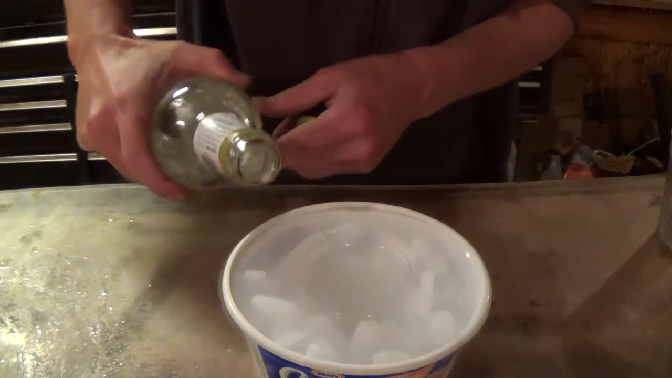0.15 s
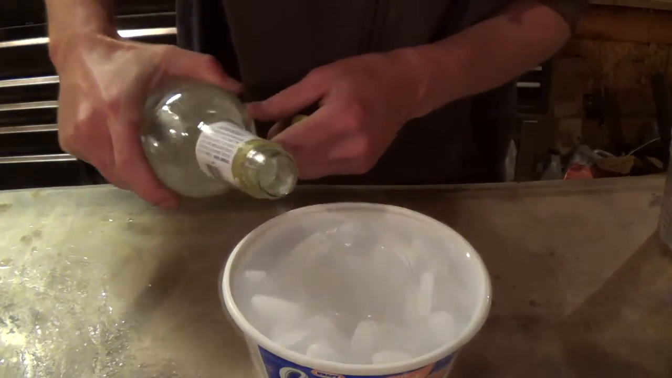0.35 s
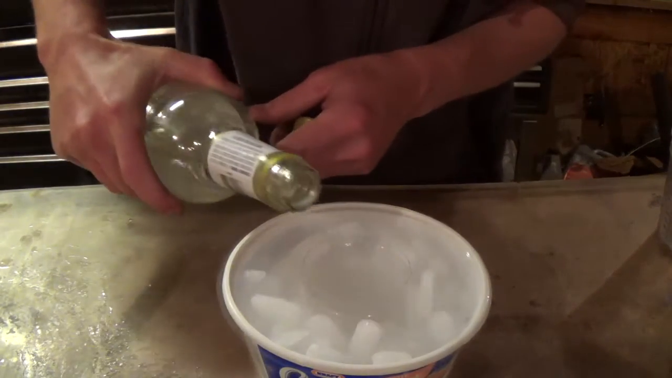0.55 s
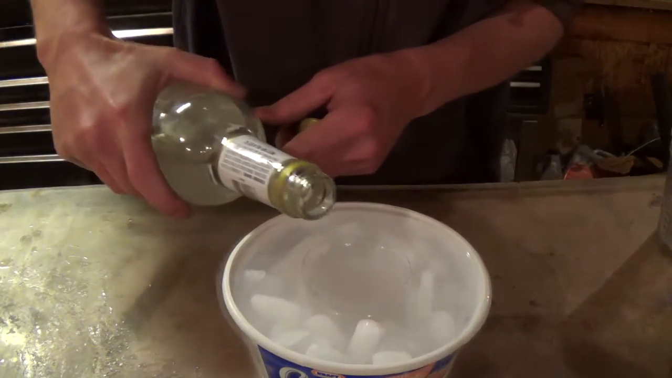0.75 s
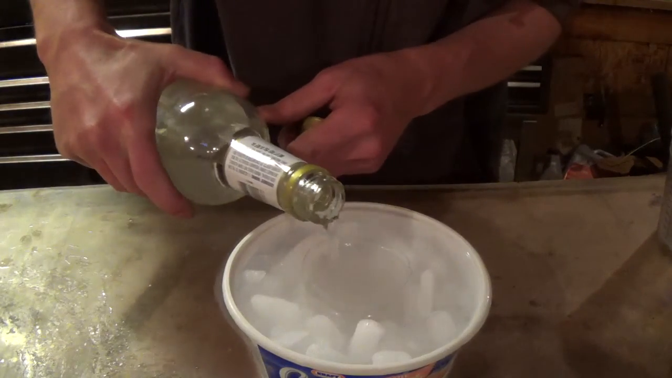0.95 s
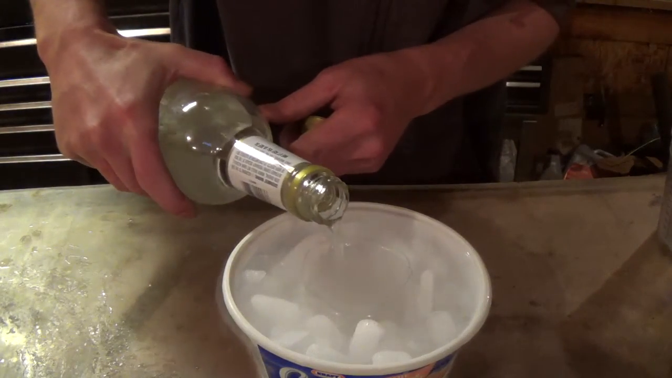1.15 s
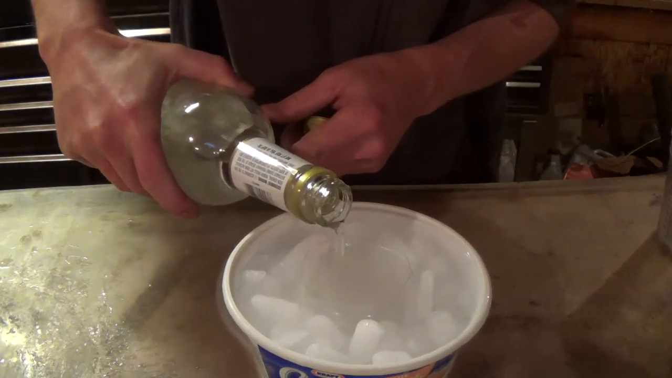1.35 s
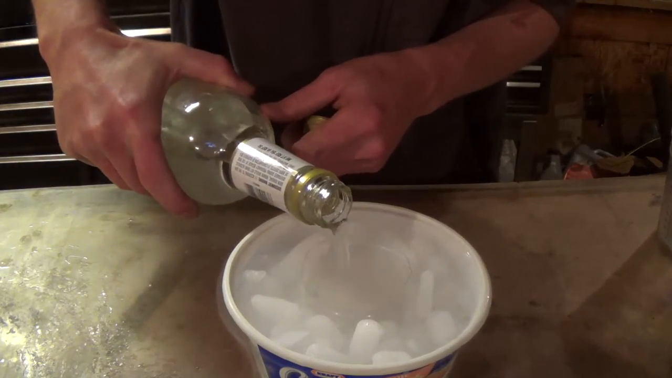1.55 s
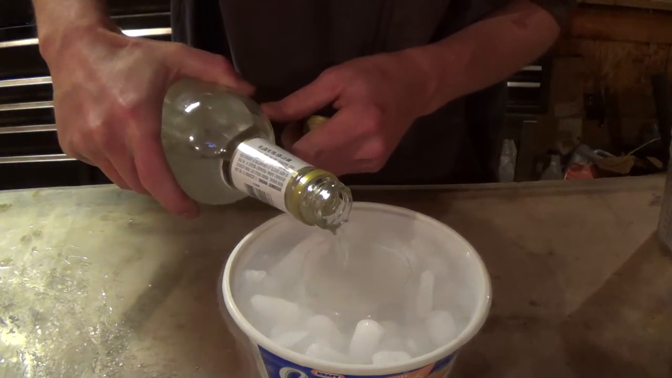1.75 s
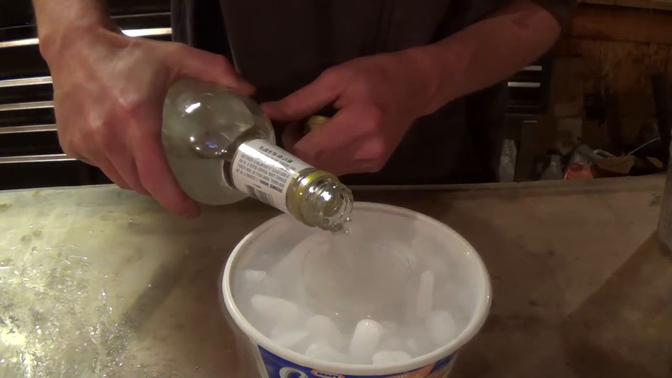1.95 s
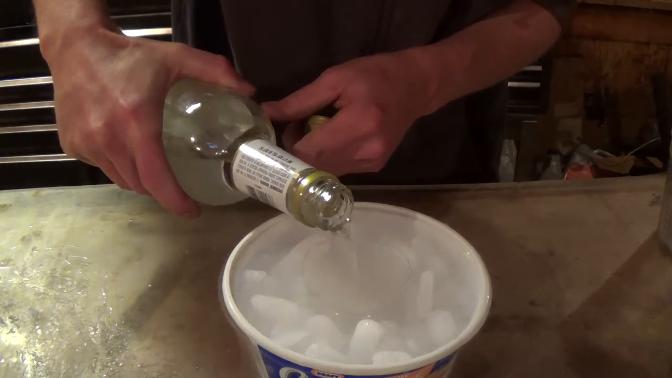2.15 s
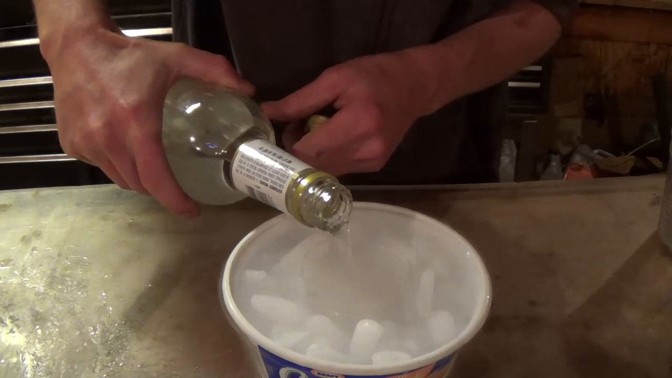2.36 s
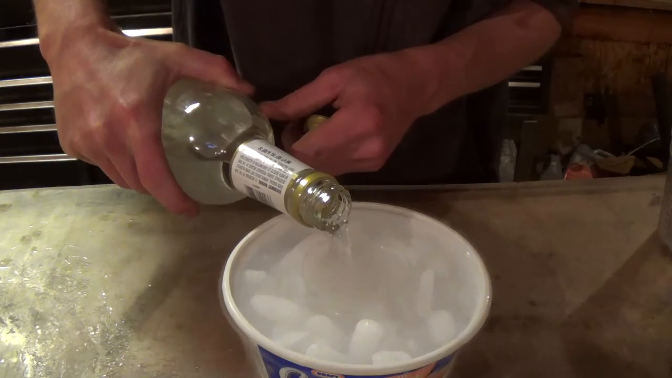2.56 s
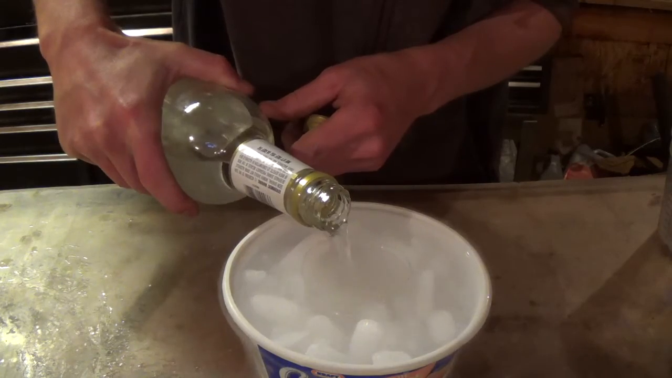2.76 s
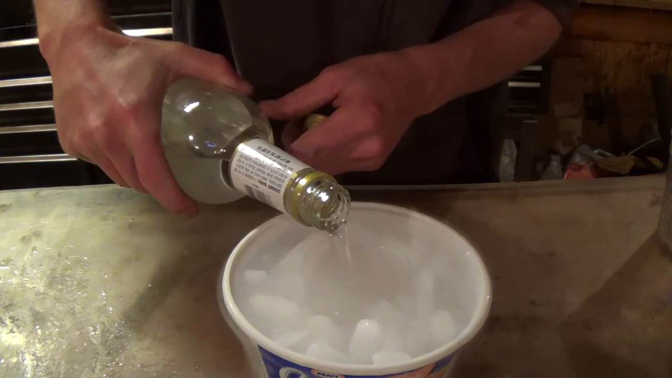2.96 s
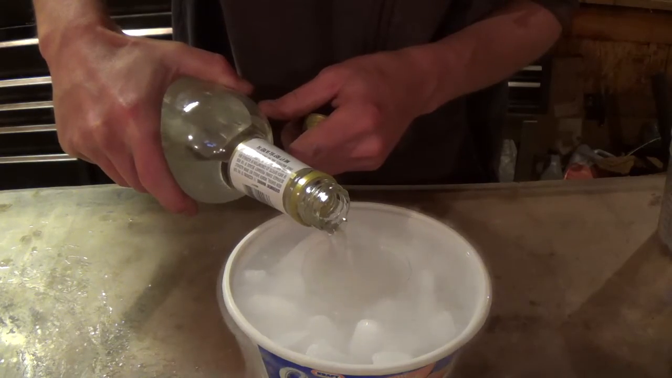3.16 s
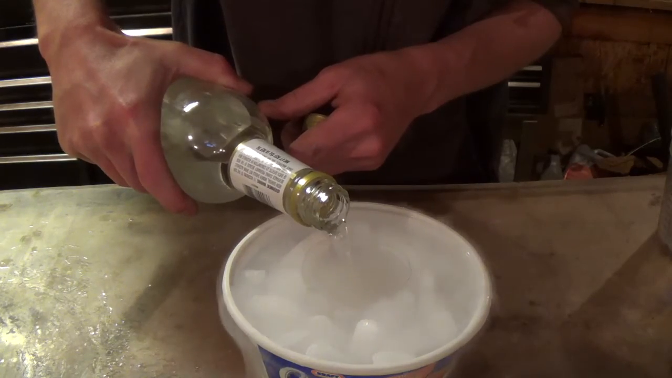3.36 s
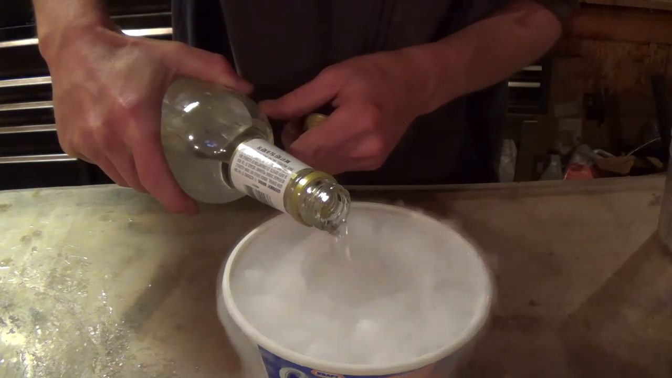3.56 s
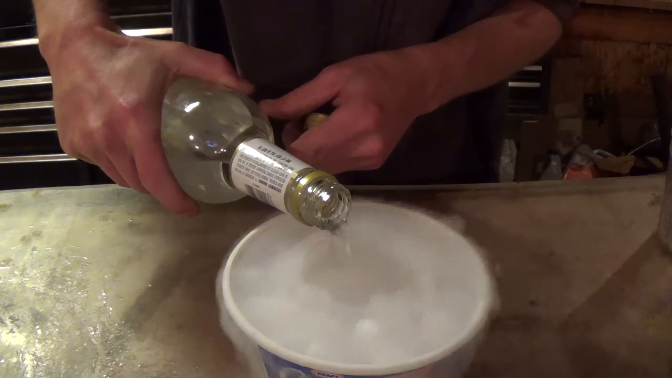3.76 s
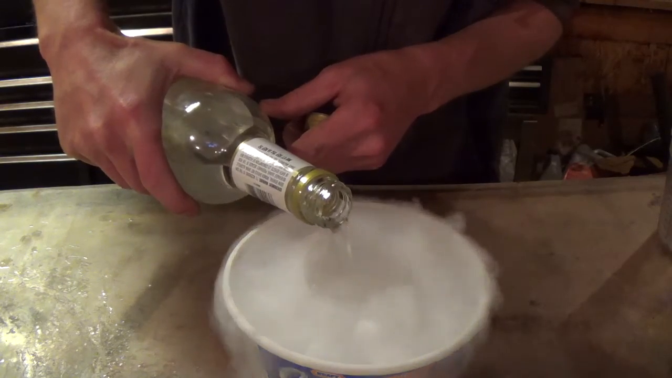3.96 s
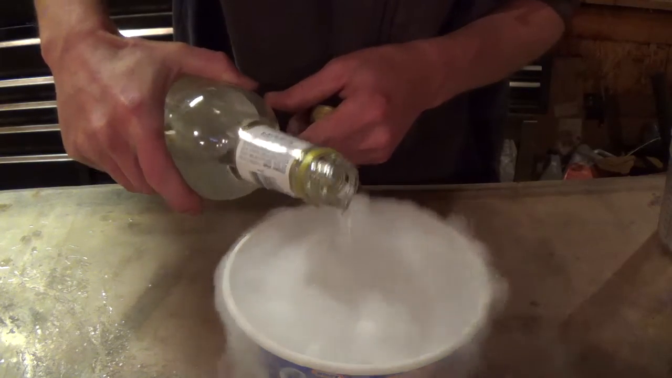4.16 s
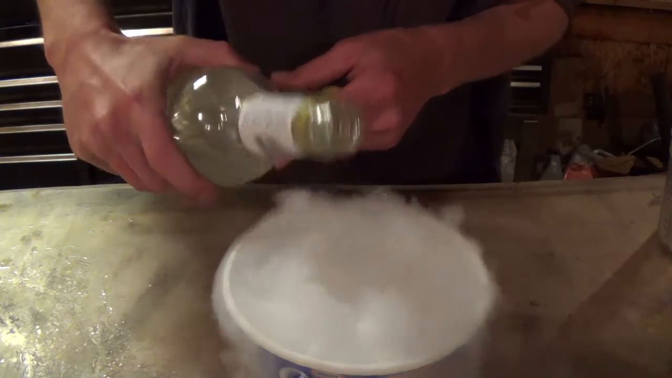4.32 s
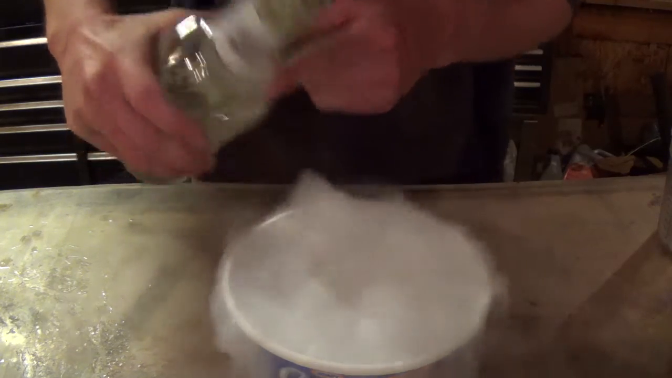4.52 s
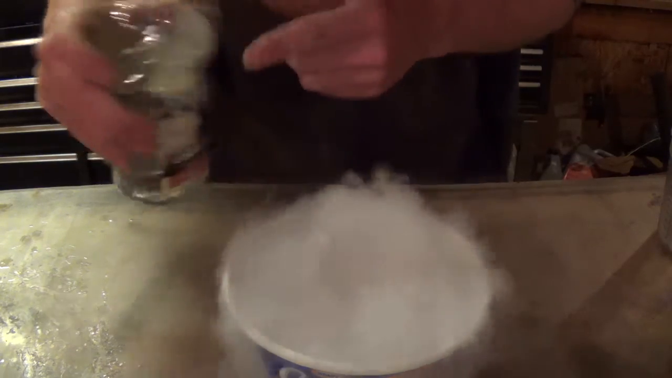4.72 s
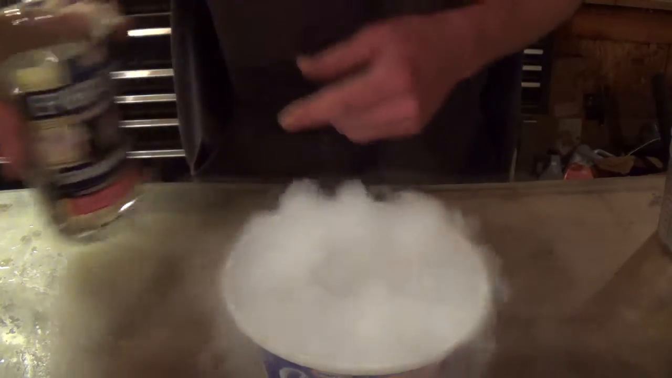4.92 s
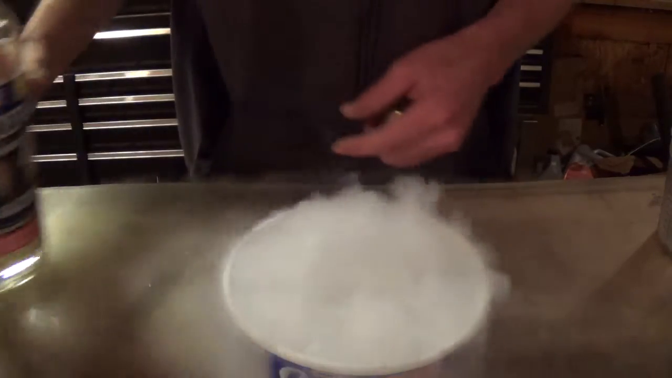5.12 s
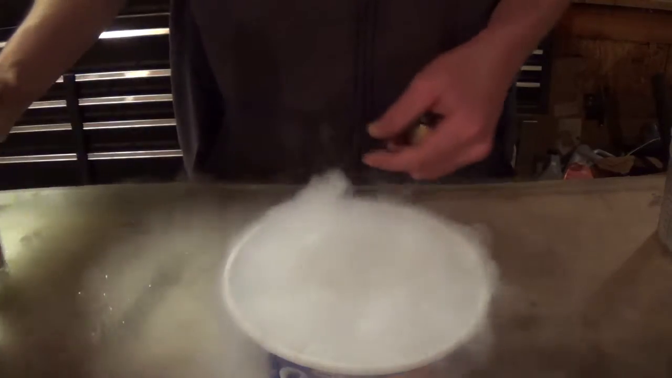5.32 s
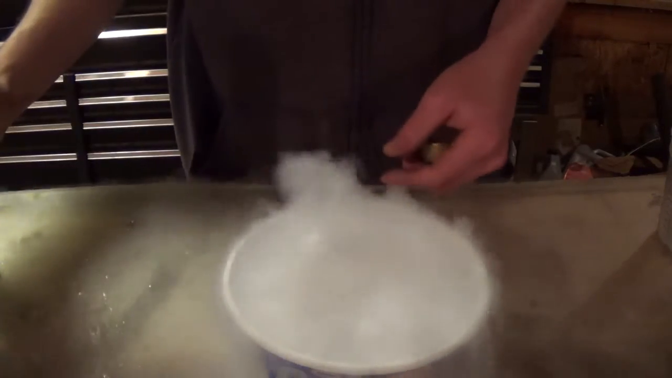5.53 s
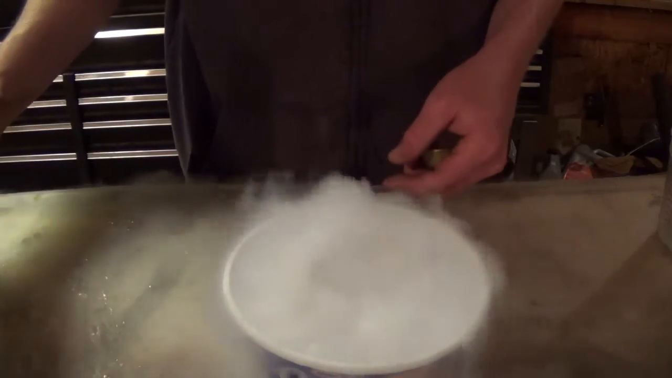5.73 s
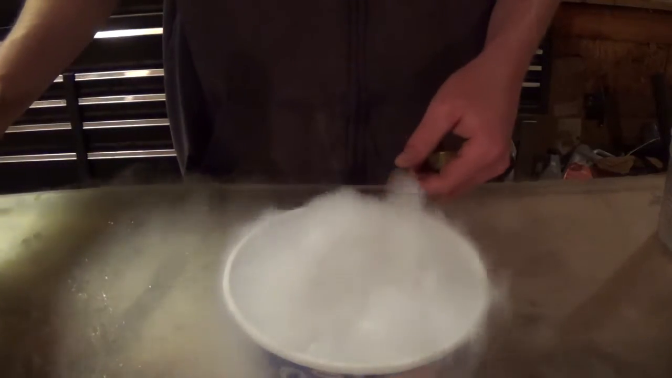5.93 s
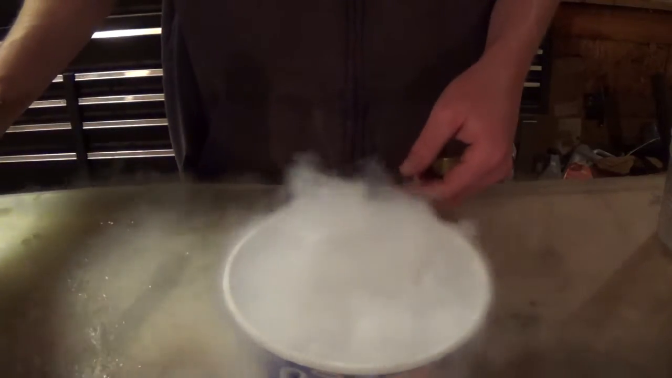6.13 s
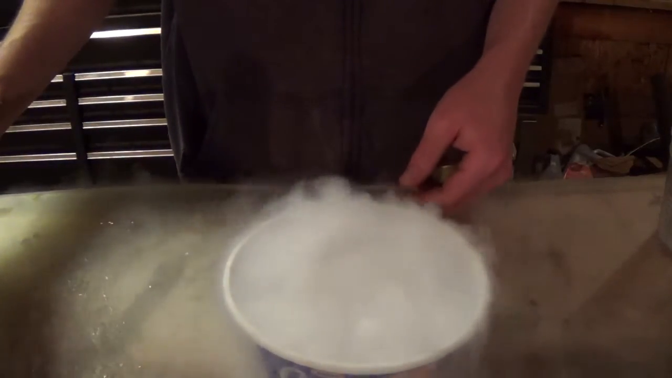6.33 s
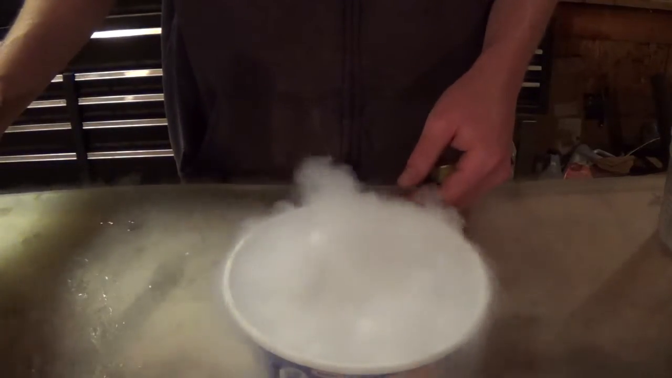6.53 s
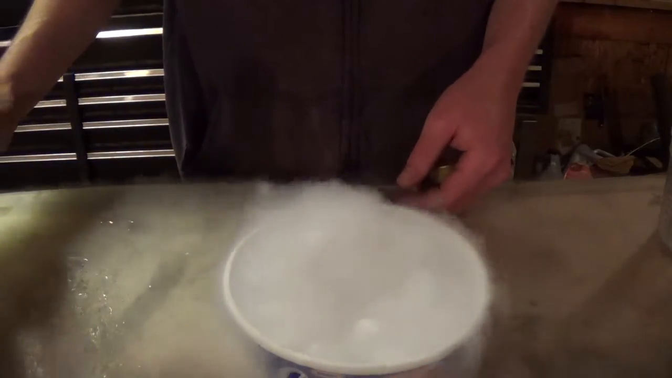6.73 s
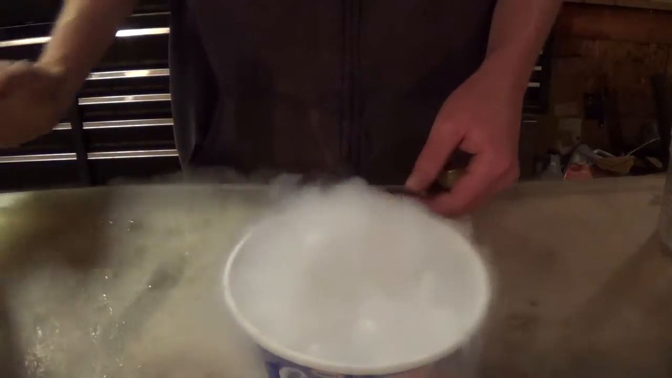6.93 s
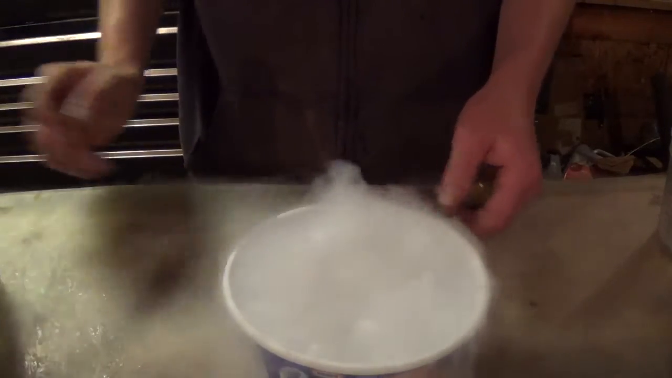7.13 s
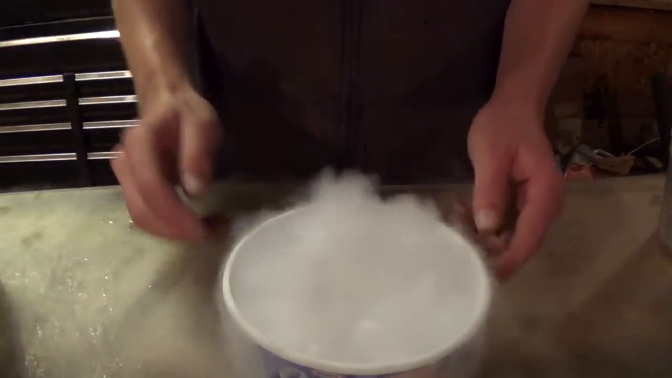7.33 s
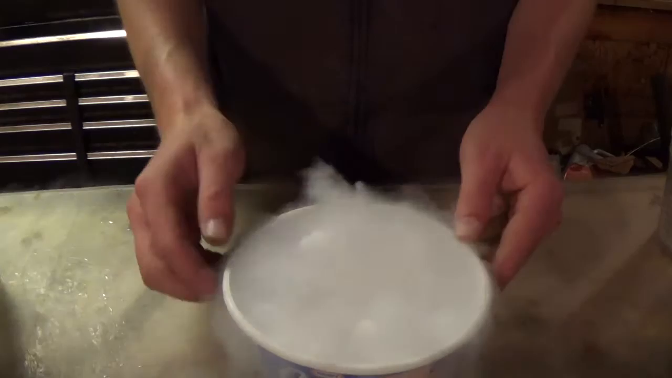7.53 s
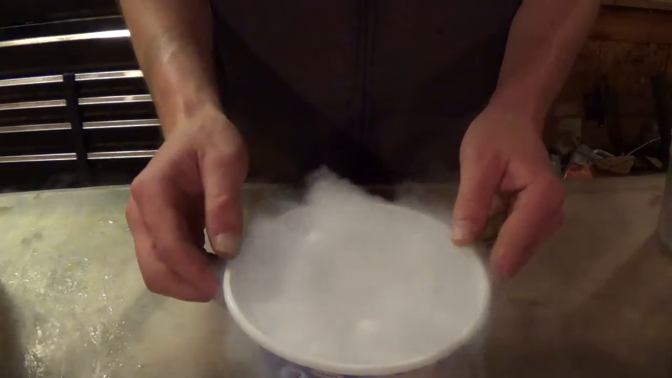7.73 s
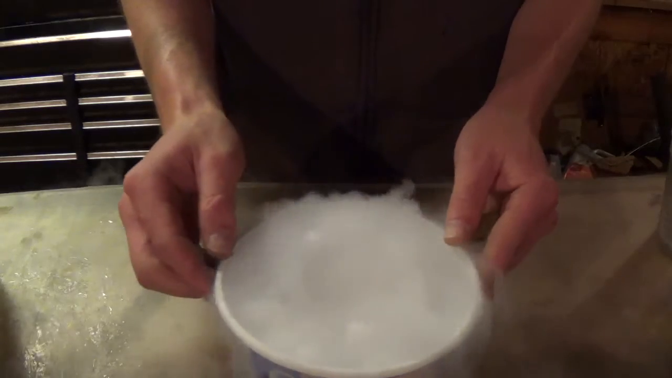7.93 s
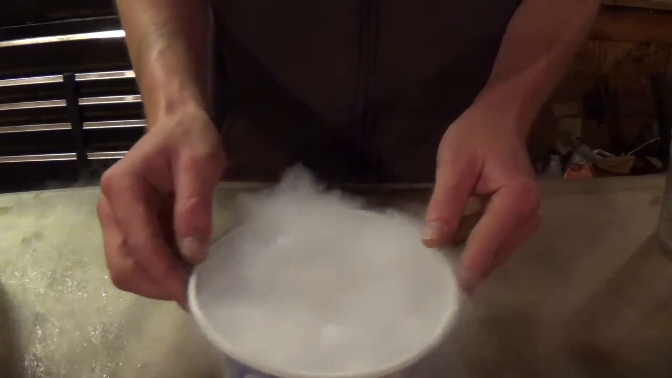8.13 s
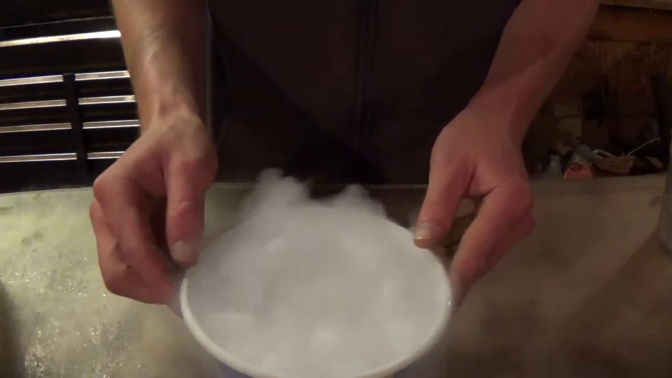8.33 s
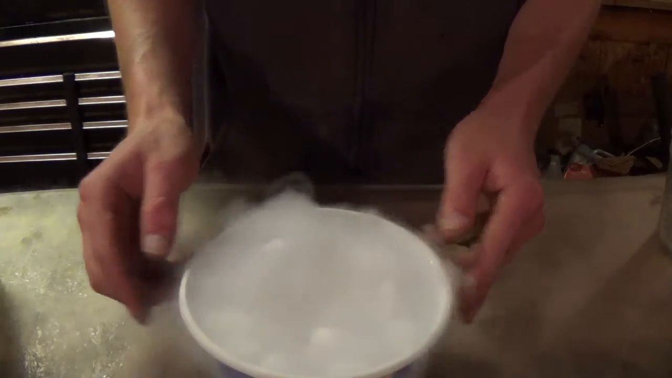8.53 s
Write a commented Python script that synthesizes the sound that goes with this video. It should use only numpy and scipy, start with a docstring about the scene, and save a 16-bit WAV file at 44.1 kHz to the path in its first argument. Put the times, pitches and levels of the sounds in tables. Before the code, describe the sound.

Liquid dribbles onto dry ice with sharp crackling pops, then a fizzing boil swells to a steady dense hiss, with a few bench knocks and scrapes.

```python
"""A workshop bench in a small room, close to a camera: liquid is poured from a bottle over dry ice in a plastic tub.
Drops crack and pop on the cold lumps as pairs of damped tones with noise bursts; then the bath boils up into
a dense fizz of tiny rising tones over blurred noise. The bottle is set down and hands nudge the tub: knocks
ring damped bench modes, and short scrapes are bands of noise. Still air lies under it, and the room answers."""
import sys
import numpy as np
from scipy import signal
from scipy.fft import rfft, irfft, next_fast_len
from scipy.io import wavfile
from scipy.ndimage import map_coordinates

SR = 44100
rng = np.random.default_rng(int(sys.argv[2]) if len(sys.argv) > 2 else 0)


def persist_wave(psi):
    """Save psi, clipped to +-1, as 16-bit WAV."""
    counts = np.round(np.clip(psi, -1, 1) * 32767).astype(np.int16)
    wavfile.write(sys.argv[1], SR, np.atleast_2d(counts).T)


def boost_factor(decibels):
    """Convert a level in decibels to a linear amplitude factor."""
    exponent = np.asarray(decibels, float) / 20
    return 10 ** exponent


N = 382788

# colour of the fine spray, from the bath and from single pops: f/Hz, level/dB per Hz
SPRAY_COLOUR = [(3820, -10), (6500, -17), (7380, -9), (10200, -2), (10800, -2.5), (11300, -23.5),
                (14700, -47), (22000, -120)]


def unit(x):
    """Scale to rms 1."""
    return x / np.sqrt(np.mean(x ** 2) + 1e-20)


def along(points, hz):
    """Interpolate (Hz, value) points on a log frequency axis."""
    f, v = np.transpose(points)
    return np.interp(np.log(hz + 1), np.log(f + 1), v)


def over_time(rows):
    """Interpolate (s, value) rows to one value per sample."""
    s, value = np.transpose(rows)
    return np.interp(np.arange(N) / SR, s, value)


def wobble(rate):
    """A smooth random curve, rate knots a second."""
    knots = rng.standard_normal(int(N * rate / SR) + 4)
    return map_coordinates(knots, [np.arange(N) * rate / SR])


def filtered(x, response):
    """x times a response of frequency."""
    m = next_fast_len(N + 8192)
    return irfft(rfft(x, m) * response(np.fft.rfftfreq(m, 1 / SR)), m)[..., :N]


def stereo(pair, spectrum, alike):
    """Turn two unrelated white signals into a coloured left-right pair of rms 1 with a set likeness."""
    def mid_side(hz):
        turn = np.arccos(np.clip(along(alike, hz), -1, 1)) / 2
        return boost_factor(along(spectrum, hz)) * [np.cos(turn), np.sin(turn)]

    mid, side = filtered(pair, mid_side)
    return unit(np.array([mid + side, mid - side]))


def still_air():
    """The still air of the shop: wide noise, heaviest in the bass; its level wavers several times a second."""
    # colour of the air: f/Hz, level/dB per Hz
    air_colour = [(15, 19.5), (30, 15), (55, 5.5), (80, -10), (213, -5), (450, -13), (970, 2), (1100, -6),
                  (1700, -9.5), (2600, -7.5), (7000, -10.5), (10500, -16.5)]
    # how alike the air is left and right: f/Hz, likeness (0-1)
    air_alike = [(60, 1), (270, 0.27), (1200, 0.21), (10000, 0.29)]
    level_db = -51.5 + 3.3 * wobble(5.8)
    return boost_factor(level_db) * stereo(rng.standard_normal((2, N)), air_colour, air_alike)


def room(x):
    """Each frequency of the room's answer dies at its own speed; the tail differs from moment to moment."""
    # how long the room rings: f/Hz, t60/s
    ring_times = [(100, 0.21), (220, 0.52), (650, 0.35), (2000, 0.4), (10000, 0.12)]
    # how alike the answer is left and right: f/Hz, likeness (0-1)
    answer_alike = [(100, 1), (500, 0.73), (3000, 0.29)]
    out, step = np.zeros((2, N + 2 * SR)), SR // 3
    for start in range(0, N, step):
        hz, t, z = signal.stft(rng.standard_normal((2, SR // 2)), SR, nperseg=256)
        turn = np.arccos(np.clip(along(answer_alike, hz), -1, 1))[:, None] / 2
        z = np.cos(turn) * z[0] + np.sin(turn) * z[1] * [[[1]], [[-1]]]
        decay = boost_factor(-60 * t / along(ring_times, hz)[:, None])
        tail = signal.istft(z * decay, SR, nperseg=256)[1]
        tail = tail / np.linalg.norm(tail[0])
        wet = signal.fftconvolve(x[None, start:start + step], tail, axes=1)
        out[:, start + 200:][:, :wet.shape[1]] += wet  # 200 samples behind the direct sound
    return out[:, :N]


def drags():
    """Lumps and bases scrape: each stroke is one band of friction noise, with gritty scratches on top."""
    # strokes: start t/s, length/s, level/dB when pressed hardest, band f/Hz,
    # share of the length at which it presses hardest
    strokes = [(3.4, 0.12, -42, 640, 0.21), (3.391, 0.048, -38, 1130, 0.079), (5.2, 0.048, -44, 1160, .3),
               (5.7142, 0.0086, -24.5, 1860, 0.073), (5.712, 0.039, -34, 1560, .45),
               (5.726, .046, -29, 663, 0.46), (5.735, 0.023, -34.5, 1000, 0.44),
               (7.96, 0.41, -54.5, 240, 0.6), (8.059, .013, -33, 3900, .2),
               (8.06, 0.0079, -27.5, 5900, .15)]
    # grit catching under a base: t/s, peak level/dB, build-up/s and die-away/s (times for 20 dB)
    scratches = [(5.7146, -18.5, .0005, 0.0083), (5.744, -31, 0.03, 0.024), (7.97, -38, .004, 0.0071),
                 (7.972, -38.5, .042, 0.055), (7.979, -25.5, 0.0013, 0.0035), (8.061, -28, .002, 0.0044),
                 (8.062, -36, 0.024, 0.024), (8.067, -40, 0.00088, 0.0049), (8.081, -36, .002, .007),
                 (8.14, -37, 0.049, 0.077), (8.172, -30.5, .0015, 0.005)]
    # colour of the grit: f/Hz, level/dB per Hz
    grit_colour = [(1000, -22), (2800, -18), (3700, -1), (5500, -5), (7500, -2.5), (10000, -0.5),
                   (11300, -3)]
    start_db, end_db, width_octaves = -13, -20.5, 0.39  # ends of a stroke; band centre to 1/e
    out, now = np.zeros(N), np.arange(N) / SR
    for s, length, db, band_hz, peak in strokes:
        hardest = np.clip(peak, .02, .98)
        press_db = np.interp((now - s) / length, [0, hardest, 1], [start_db, 0, end_db], -150, -150)
        band = lambda hz: np.exp(-(np.log2((hz + 1) / band_hz) / width_octaves) ** 2)
        rub = filtered(rng.standard_normal(N), band)
        rub_rms = np.sqrt(np.average(rub ** 2, weights=boost_factor(2 * press_db)))
        out += boost_factor(db + press_db) * rub / rub_rms
    catch = np.zeros(N)
    for s, db, rise, fall in scratches:
        catch += boost_factor(db - 20 * np.maximum((s - now) / rise, (now - s) / fall))
    rough = rng.standard_normal(N) * boost_factor(1.0 * wobble(250))
    grit = unit(filtered(rough, lambda hz: boost_factor(along(grit_colour, hz))))
    return out + catch * grit


def knocks():
    """Blows on tub and bench ring damped modes, the softer the contact the lower; a short clack starts each."""
    # blows: t/s, relative level/dB, contact/ms, gain of the boom below 450 Hz/dB, left-right/dB
    blows = [(3.3796, -17.5, 1.06, -19, -2.5), (3.392, -19.5, 0.85, -20, 3), (3.42, -34, 1, -32, -2),
             (5.2491, -9.5, 0.47, -3, 4), (5.626, -32.5, 0.16, -2, 1), (5.742, -27, 0.5, -26, 12),
             (5.751, -28.5, 1.3, 7.5, 2), (8.000, -44, 1.3, 9.5, 0), (8.069, -30.5, 0.61, -2, 2),
             (8.234, -30, 0.72, 6, 1.5), (8.245, -35, 1, 4.5, 0)]
    # what the bench rings with: f/Hz, usual level/dB, t60/s
    bench_modes = [(68, -1, 0.052), (137, -3.5, 0.063), (211, 0.5, 0.082), (291, -3, 0.087),
                   (387, -2, 0.067), (476, -2, 0.03), (609, 1.5, 0.046), (674, 2.5, 0.042),
                   (916, -9, 0.026), (1218, -10, 0.056), (1750, 5, 0.011), (2140, 1, 0.012)]
    out, t = np.zeros((2, N + SR)), np.arange(SR // 2) / SR
    dull = signal.butter(3, [1000, 2200], "bandpass", fs=SR, output="sos")
    no_bass = signal.butter(2, 260, "highpass", fs=SR, output="sos")
    low = np.transpose(bench_modes)[0] < 450
    for s, db, ms, boom_db, pan_db in blows:
        modes = []
        for hz, level, t60 in bench_modes:
            strength_db = level + rng.normal(0, 1.5)  # no two blows alike
            softness = 1 + (hz * ms / 700) ** 2
            modes.append(boost_factor(strength_db - 60 * t / t60) * np.sin(2 * np.pi * hz * t) / softness)
        modes = np.array(modes) * (1 - np.exp(-t * 6000 / ms))
        boom = boost_factor(boom_db) * modes[low].sum(0)
        upper = signal.sosfilt(no_bass, modes[~low].sum(0))  # keeps the upper ring free of bass; the boom carries it
        clack_db = -14 - 6.5 * np.log2(ms)  # harder contacts clack more
        clack_noise = boost_factor(clack_db - 60 * t / 0.035) * rng.standard_normal(len(t))
        clack = 6.5 * signal.sosfilt(dull, clack_noise)
        sides = boost_factor(db - 8.0 + np.array([[pan_db], [-pan_db]]) / 2)
        out[:, round(s * SR):][:, :len(t)] += sides * (clack - boom - upper)
    return out[:, :N]


def pops():
    """Each burst: two close damped tones of its bubble, a snap that rings the tub, and a spit of spray."""
    # bursts: t/s, relative level/dB, nominal f/Hz (the tone starts 6.6 % lower), snap relative to the burst/dB
    bursts = [(0.358, -25, 4950, -7.5), (0.946, -30, 9100, -8), (0.955, -30, 2400, -9),
              (0.964, -28, 10800, -18), (1.058, -34, 4200, -10), (1.066, -21.5, 10200, -20),
              (1.083, -37, 655, -9), (1.089, -30, 2500, -8), (1.095, -22.5, 4660, -4.5),
              (1.098, -31, 1960, -2), (1.105, -25, 5860, -17), (1.133, -30.5, 6500, -5),
              (1.136, -28, 5300, -11), (1.144, -22.5, 2360, -11), (1.15, -23, 2700, -6),
              (1.159, -22, 3750, -3.5), (1.176, -39, 2500, -10), (1.219, -20, 5240, -13),
              (1.235, -26.5, 2270, -15), (1.256, -28, 10000, -18), (1.268, -31, 5430, -5),
              (1.727, -22, 3780, -7), (1.729, -36, 905, -12), (1.744, -29, 4730, -14),
              (1.789, -30, 920, 2.5), (1.83, -24.5, 5550, -12), (1.912, -24, 10600, -16),
              (1.925, -14.5, 9160, -22), (1.945, -25, 9900, -21), (2.056, -25.5, 5300, -10),
              (2.123, -26, 3320, -4.5), (2.13, -29, 5700, -9), (2.157, -23.5, 8950, -19),
              (2.169, -25, 9340, -21), (2.349, -29, 3000, -17), (2.365, -24, 5900, -9),
              (2.366, -23, 8700, -18), (2.398, -29, 4380, -6), (2.441, -19, 9900, -16),
              (2.454, -12.5, 10550, -19), (2.473, -31, 5500, -15), (2.81, -28.5, 5150, -4),
              (3.91, -23.5, 5450, -4), (3.967, -21, 2830, -12), (4.052, -18.5, 2770, -3.5),
              (4.185, -23, 1200, -18), (4.214, -27, 1310, -10), (4.2165, -18, 9700, -14),
              (4.251, -16, 9200, -22), (4.261, -23, 4940, -15), (4.279, -24.5, 1280, -3),
              (4.334, -26, 2700, -7), (4.859, -17, 4900, -20), (6.579, -22, 2730, -5),
              (8.417, -11.5, 5100, -13), (8.418, -14.5, 2300, -14), (8.43, -25.5, 1260, -7)]
    # colour the tub gives a snap: f/Hz, level/dB per Hz
    snap_colour = [(300, -35), (800, 3.5), (1330, -4), (2600, 0.5), (3700, 1), (5200, 0), (7000, -6),
                   (8000, -36)]
    out, t = np.zeros((3, N + SR)), np.arange(SR // 20) / SR
    for s, db, hz, snap_db in bursts:
        spit_db = -16 - 3.5 * np.log2(hz / 5000)  # small bubbles throw less of it
        life = 0.0021 * (3000 / hz) ** 0.45  # s; large bubbles ring longer
        phase = 2 * np.pi * hz * t * (0.934 + 0.029 * t / life)  # the pitch climbs as the bubble opens
        tone = np.sin(phase) + 0.62 * np.sin(phase * rng.uniform(0.836, 1.176))
        tone = tone * 1.46 * t / life * np.exp(-t / life * 2)
        rise = 1 - np.exp(-(t / .0007) ** 2)
        noise = rng.standard_normal((2, len(t))) * np.exp(-t / 0.0027) * rise * 1.14
        burst = np.vstack([tone, boost_factor([[snap_db], [spit_db]]) * noise])
        out[:, round(s * SR):][:, :len(t)] += boost_factor(db) * burst
    tones, snaps, spits = out[:, :N]
    snaps = filtered(snaps, lambda hz: 1.13 * boost_factor(along(snap_colour, hz)))
    spits = filtered(spits, lambda hz: 2.36 * boost_factor(along(SPRAY_COLOUR, hz)))
    return tones + snaps + spits


def bubbles(count, lo_hz, hi_hz, cycles, spread_db):
    """A swarm of short damped tones that rise in pitch as they burst, spread evenly over a band."""
    when, pitch, size, life = rng.random((count, 4)).T
    hz = lo_hz + (hi_hz - lo_hz) * pitch
    turns = hz[:, None] * np.arange(int(5e6 // count)) / SR
    fade = turns / (cycles * (.5 + life[:, None]))
    strength = boost_factor(-spread_db * np.log(size + 1e-4))[:, None]  # a few are much louder
    grains = strength * np.sqrt(hz)[:, None] * fade * np.exp(-3 * fade)
    grains = grains * np.sin(2 * np.pi * turns * (1 + 0.089 * fade))
    at = (when * N).astype(int)[:, None] + np.arange(turns.shape[1])
    return unit(np.bincount(at.ravel(), grains.ravel())[:N])


def froth(swarm, share, spectrum):
    """Distinct bubbles, share of the power in one of two signals, over noise: the blur of countless smaller ones."""
    # how alike the close bath is left and right: f/Hz, likeness (0-1)
    bath_alike = [(100, 0.97), (1000, 0.88), (10000, 0.92)]
    share = np.clip(share, 0, 1)
    blur = rng.standard_normal((2, N))
    blur[0] = np.sqrt(1 - share) * blur[0] + np.sqrt(share) * swarm
    return stereo(blur, spectrum, bath_alike)


def bath():
    """Gas boils off the lumps in surges that all bubble sizes share; spray and gurgles follow the boiling."""
    # how hard the bath boils, before the surges: t/s, level/dB
    boiling = [(0.0, -52.5), (0.92, -53.5), (1.18, -51), (1.57, -52.5), (2.7, -47.5), (3.5, -42.5),
               (4.42, -39.5), (6.53, -40.5), (7.88, -41), (8.02, -40.5), (8.68, -41.5)]
    # colour the tub gives the boiling bubbles: f/Hz, level/dB per Hz
    boil_colour = [(590, -14.5), (1000, -7), (1230, -5.5), (1330, -14), (1530, -2.5), (2610, 1),
                   (3790, -5.5), (5190, 0), (7040, -9.5), (7600, -40), (9880, -42), (16700, -120)]
    # colour the tub gives the large, gurgling bubbles: f/Hz, level/dB per Hz
    gurgle_colour = [(70, -38), (120, -24), (350, -5.5), (520, -1.5), (600, 1), (680, 5), (780, -1.5),
                     (900, 3), (1000, -9.5), (1220, -6), (1400, -2.5), (1900, -24.5)]
    boil_db = over_time(boiling)
    below = boil_db + 40  # dB relative to a full boil at -40 dB
    surge = .5 * wobble(5.1) + 0.39 * wobble(30)  # dB

    swarm = bubbles(count=25000, lo_hz=975, hi_hz=7025, cycles=4.7, spread_db=2.0)
    boil = froth(swarm, 0.15, boil_colour)
    boil = boost_factor(boil_db + surge + 0.33 * wobble(15)) * boil

    swarm = bubbles(count=40000, lo_hz=5860, hi_hz=11330, cycles=5.2, spread_db=2.0)
    spray = froth(swarm, 0.11, SPRAY_COLOUR)
    spray_db = -44.5 + 0.76 * below  # grows more slowly than the boil
    spray = boost_factor(spray_db + surge + 0.1 * wobble(8.7)) * spray

    swarm = bubbles(count=6000, lo_hz=203.5, hi_hz=1403, cycles=5.37, spread_db=1.4)
    gurgle = froth(swarm, 0.09, gurgle_colour)
    deep = np.hypot(boost_factor(-48.5 + 1.8 * below), boost_factor(-63.5))  # grows faster; -63.5 dB is left in a calm bath
    gurgle = deep * boost_factor(surge + .7 * wobble(10)) * gurgle
    return boil + spray + gurgle


def scene():
    """Bath, pops and bench close by, the room's answer to pops and bench, and still air."""
    bursts, bench = pops(), knocks() + drags()
    tub = boost_factor([[-.2], [.2]]) * (bath() + bursts)  # dB; a shade to the right
    answer = room(boost_factor(-14.0) * bursts + boost_factor(-7.5) * bench.mean(0))
    return tub + bench + answer + still_air()


def roll_off(x):
    """The treble ends steeply here."""
    return signal.sosfilt(signal.butter(12, 12350, fs=SR, output="sos"), x)


def record(dry):
    """The camera's small microphones lose the deep bass, and a steep band limit cuts the top."""
    x = signal.sosfilt(signal.butter(4, 57, "highpass", fs=SR, output="sos"), dry)
    top_hz = 11150
    x = filtered(x, lambda hz: 1 / (1 + (hz / top_hz) ** 180))
    return roll_off(x)


dry = scene()
out = record(dry)
persist_wave(out)
```